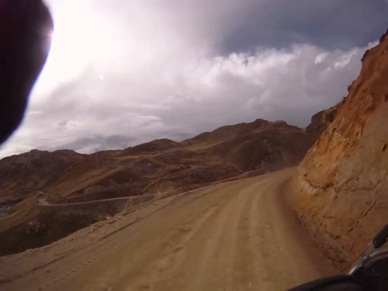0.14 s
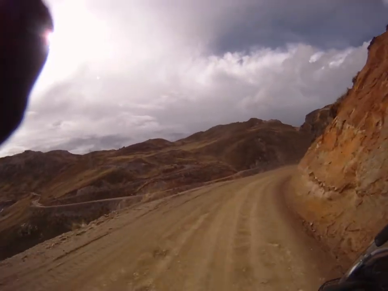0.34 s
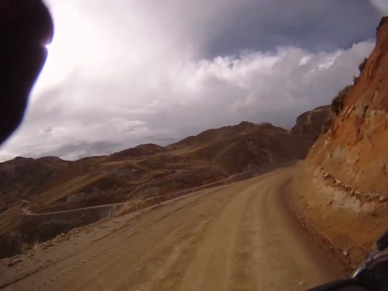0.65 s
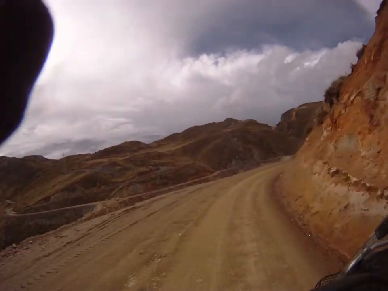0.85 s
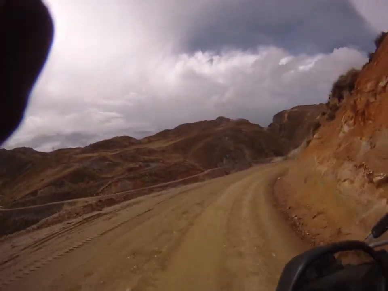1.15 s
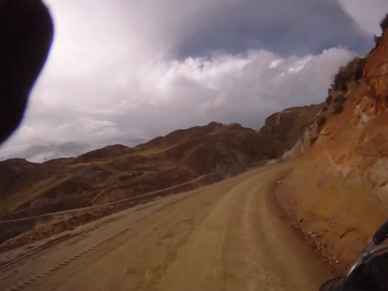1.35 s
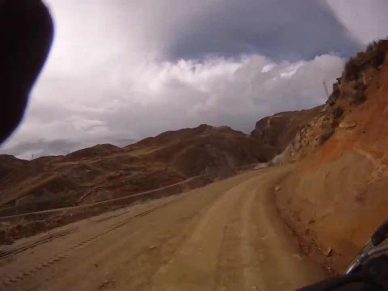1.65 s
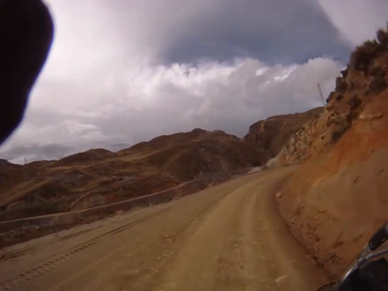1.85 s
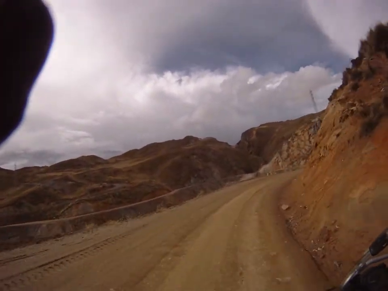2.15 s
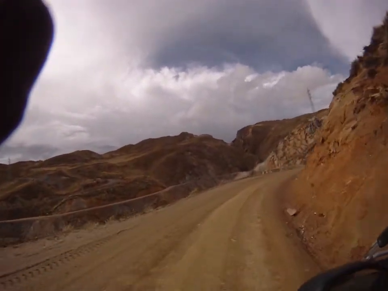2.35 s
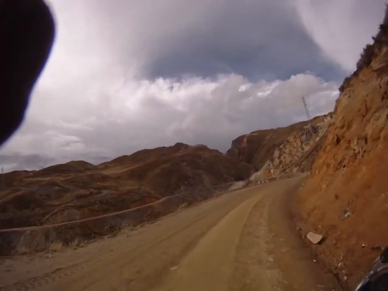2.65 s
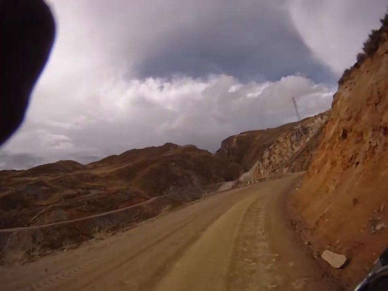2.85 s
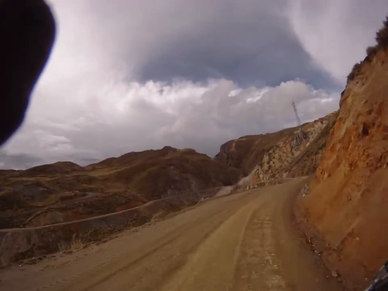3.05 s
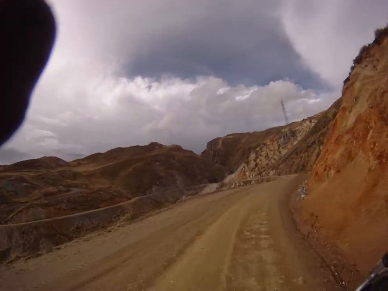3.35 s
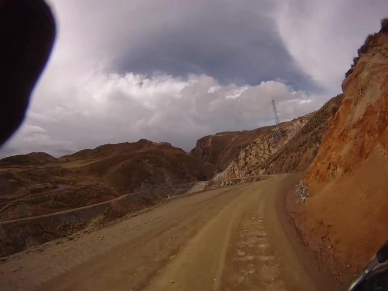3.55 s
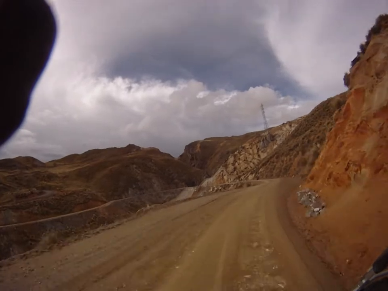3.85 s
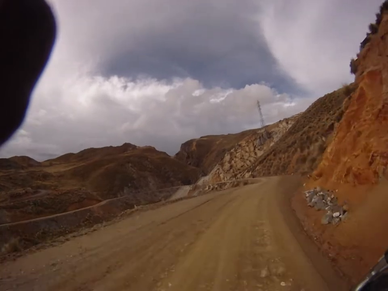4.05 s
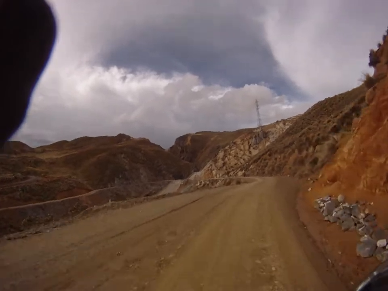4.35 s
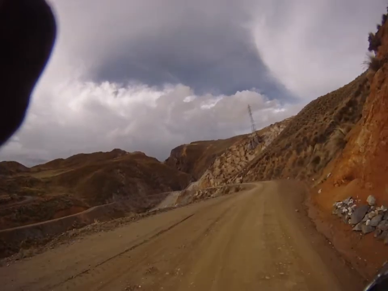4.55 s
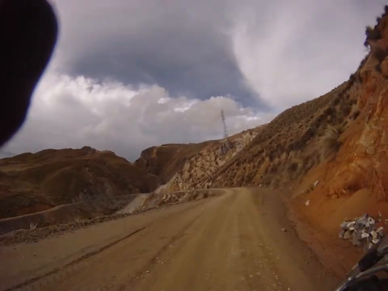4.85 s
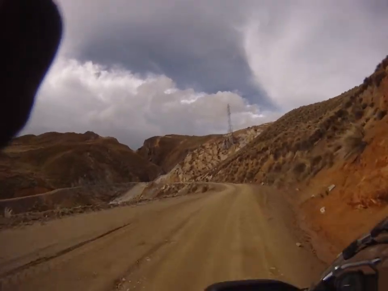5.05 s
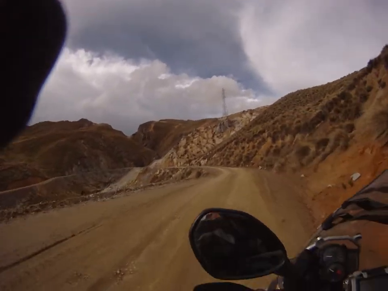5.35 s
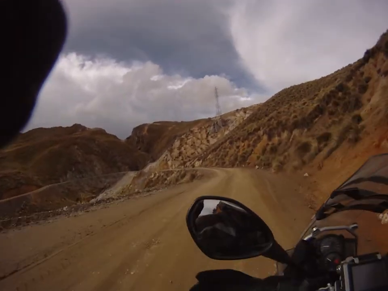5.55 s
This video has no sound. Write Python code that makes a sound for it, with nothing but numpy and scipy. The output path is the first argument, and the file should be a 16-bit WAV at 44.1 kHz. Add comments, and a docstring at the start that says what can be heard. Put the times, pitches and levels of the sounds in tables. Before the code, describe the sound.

Muffled motorcycle engine and gritty tyre roar run along a dirt road, ending in dry rattles, sharp loud knocks and a brief cloth scrape.

```python
"""Motorcycle on a gravel road

A motorcycle rolls along gravel, heard by a small helmet camera in a closed plastic case.
Low engine orders hum as sines under lumps of low wind noise and dull filtered gravel grains.
Noise for engine clatter and tyre roar excites the resonances of the case; straps rattle and knock on it,
cloth drags over it, and pushes move the diaphragm.
The recorder samples at a low rate and holds each sample, which mirrors the spectrum upwards."""
import sys
import numpy as np
from scipy import signal
from scipy.fft import rfft, irfft, next_fast_len
from scipy.io import wavfile

SR = 44100
rng = np.random.default_rng(int(sys.argv[2]) if len(sys.argv) > 2 else 0)


def store_pcm(level_fs):
    """Save levels as 16-bit WAV."""
    pcm = np.round(np.clip(level_fs, -1, 1) * 32767).astype(np.int16)
    wavfile.write(sys.argv[1], SR, np.atleast_2d(pcm).T)


N = 250929  # length in samples

# Wind noise at the port. Each row: frequency in Hz, relative spectral density in dB per Hz.
WIND_SPECTRUM = [(7.1, -32), (12, 9), (86, -0.5), (179, -8), (219, -10), (328, -18.5), (500, -19),
                 (650, -78), (1100, -120)]
# Strength of the wind. Each row: time in seconds, mean level in dB.
WIND_GUSTS = [(0.0, -53), (0.13, -47), (0.45, -46), (0.57, -43.5), (0.8, -51.5), (1.2, -53), (1.7, -47),
              (2.0, -52), (2.5, -48.5), (3.9, -51), (4.12, -48.5), (4.72, -51.5), (5.0, -48), (5.3, -45),
              (5.56, -51), (5.69, -46)]
# Low gravel crunch. Each row: time in seconds, mean level in dB.
CRUNCH_LEVELS = [(0, -54.5), (.6, -53.5), (1.3, -82), (2, -77), (3.4, -60), (4, -51.5), (4.4, -65),
                 (5, -52.5), (5.69, -53)]
# Resonances of the plastic case. Each row: frequency in Hz, bandwidth in Hz, gain in dB.
CASE_MODES = [(528, 231, -6), (1126, 126, -8), (1444, 63, -2), (1664, 500, 5), (2353, 521, 1.5),
              (2940, 272, -5.5), (3174, 185, -5.5), (3710, 281, 3), (4440, 500, -12), (4680, 490, -24.5),
              (6060, 51, -55)]
# Strap rattling on the case. Each row: nominal time in seconds, nominal peak in dB, decay length in ms,
# pitch of the contact in Hz.
STRAP_RATTLES = [(0.1587, -47, 13, 1770), (0.3674, -35, 18, 2310), (2.186, -30, 7, 1630),
                 (3.8843, -36, 7.5, 1800), (3.917, -26.5, 8.9, 1720), (3.9489, -29, 12, 2320),
                 (3.986, -23.5, 18, 1750), (4.0052, -27, 9.4, 2120), (4.039, -50, 14, 1580),
                 (4.057, -27.5, 7.6, 1600), (4.082, -24, 10, 2080), (4.11, -28, 12, 1930),
                 (4.132, -27, 4.4, 3600), (4.1436, -20.5, 9.8, 1970), (4.1986, -20.5, 22, 2240),
                 (4.433, -28, 18, 3300), (4.6647, -20, 24, 2030), (4.7296, -21.5, 24, 2700),
                 (4.7644, -35, 22, 760), (4.795, -20, 10.5, 1840), (4.849, -32, 20, 3540),
                 (4.8677, -25.5, 14, 1770), (4.9242, -39, 4, 2090)]
# Hard knocks on the case. Each row: start in seconds, rms level over the blow in dB, length in ms,
# pitch of the contact in Hz, relative gain of the dull body in dB, signed push on the diaphragm.
CASE_KNOCKS = [(1.594, -24.5, 0.87, 860, 14.5, 0.03), (4.9994, -10, 4.6, 1760, -2, -0.36),
               (5.028, -17.5, 8.8, 1850, -22, -0.031), (5.0321, -10.5, 3.35, 3520, 17, 0.15),
               (5.2083, -12.5, 1.9, 1100, 9, 0.11), (5.2989, -17.5, 1.05, 1130, -11, 0.018),
               (5.3165, -16, 0.74, 2240, -8, -0.072), (5.321, -32, 1.7, 2020, -6, -0.014)]
# Soft shoves that only move the diaphragm. Each row: start in seconds, length in ms, signed push.
SOFT_SHOVES = [(5.279, 15, 0.024), (5.304, 8.4, -0.038), (5.332, 4.7, 0.062), (5.339, 10, -0.023),
               (5.617, 9.8, -0.016), (5.627, 7.5, 0.025)]
# Engine and tyre roar outside the case. Each row: frequency in Hz, relative spectral density in dB per Hz.
ROAR_SPECTRUM = [(150, -35), (260, 10), (450, -4.5), (800, -9.5), (1300, -1), (2400, -5.5), (3100, 3),
                 (4300, -4.5), (5300, 3.5), (5700, -4), (6100, -7)]
# Engine speed. Each row: time in seconds, crank turns per second.
CRANK_SPEED = [(0.0, 40.6), (0.22, 43.0), (0.6, 41.2), (0.73, 44.6), (1.2, 41.9), (1.31, 44.6),
               (1.55, 43.1), (1.7, 44.3), (1.9, 43.6), (2.1, 44.5), (2.45, 43.6), (2.75, 44.4), (3.0, 43.8),
               (3.75, 43.3), (3.88, 44.4), (4.2, 42.7), (4.55, 41.3), (4.75, 42.0), (5.0, 40.8),
               (5.69, 40.6)]
# Engine orders at cruising speed. Each row: multiple of the crank rate, mean rms level in dB before wavering.
ENGINE_ORDERS = [(.5, -61), (1, -58.5), (2, -57), (3, -60.5), (5, -66), (9, -74), (11, -76), (13, -70),
                 (15, -72), (16, -75), (18, -76)]

LUMP_DB, WAVER_DB = 1.7, 1.5  # spread of the lumps in wind and crunch, and of the wavering hum
RUB_S, RUB_DB, RUB_GRAIN_DB = 5.296, -35.5, 3.5  # start, level, unevenness of the drag
RUB_ATTACK_S, RUB_HOLD_S, RUB_FADE_DB_PER_S = 0.0058, 0.061, 330  # the hold is counted from the start
RATTLE_GRIT, RATTLE_ATTACK_MS = 0.7, 2.3  # log spread of micro-contact sizes, rise time
RATTLE_CREST_DB = 14  # nominal peak over rms
RATTLE_THUD_DB = -59  # offsets the rattle level, so strong rattles have relatively less dull body
SLIP_SPREAD_DB, BLOW_FADE_DB = 3, 2.5  # unevenness of the slips, loss of strength along a blow
PUSH_MS = 1.88  # push under a blow of 1 ms; it grows with the root of the blow's length
CRUISE_PER_S = 43.4  # crank turns per second
ROAR_DB, ROAR_DB_PER_TURN = -43.5, 0.66  # level at cruise, rise with each further turn per second
PATCH_S, PATCH_HALF_S, PATCH_DB = 4.13, 0.2, 2.5  # loose patch of road: middle, half length, rise of the roar
HUM_DB_PER_TURN = 0.13  # per order and further turn per second: high orders sing when the engine pulls
OVERLOAD = 1.1  # height towards which peaks are rounded
GUARD_HZ, CUTOFF_HZ = 5830, 15270  # low-pass ahead of the sampler, final low-pass
HOLD_UP, HOLD_DOWN, HOLD = 40, 147, 4  # ratio from 44.1 to 12 kHz, copies of each sample


def from_db(db):
    """Level law: twenty decibels are a factor of ten in amplitude."""
    return 10 ** (np.asarray(db) / 20)


def rms_one(x):
    """Power normalisation: scale a signal to rms 1."""
    return x / np.sqrt(np.mean(x ** 2) + 1e-20)


def in_time(rows):
    """Linear interpolation: a curve of time and value, sample by sample."""
    seconds, values = np.transpose(rows)
    return np.interp(np.arange(N) / SR, seconds, values)


def drift(rate):
    """Low-passed noise: two equal poles at the rate in Hz leave slow chance of spread 1."""
    step = 20  # samples between computed points
    pole = np.exp(-2 * np.pi * rate * step / SR)
    noise = rng.standard_normal(N // step + 2002)
    slow = signal.lfilter([1], [1, -2 * pole, pole * pole], noise)[2000:]  # settled part
    return np.interp(np.arange(N) / step, np.arange(len(slow)), rms_one(slow))


def coloured(x, spectrum):
    """Spectral shaping: weight each frequency of a noise; the result has rms 1."""
    size = next_fast_len(N)
    table_hz, table_db = np.transpose(spectrum)
    hz = np.maximum(np.arange(size // 2 + 1) * SR / size, 1)
    gain = from_db(np.interp(np.log(hz), np.log(table_hz), table_db))
    return rms_one(irfft(rfft(x, size) * gain, size)[:N])


def resonance(x, hz, width):
    """Damped oscillator: a pole pair whose radius sets the bandwidth, with gain 1 on top."""
    radius = np.exp(-np.pi * width / SR)
    zeros = np.array([1, 0, -1]) * (1 - radius * radius) / 2
    poles = [1, -2 * radius * np.cos(2 * np.pi * hz / SR), radius * radius]
    return signal.lfilter(zeros, poles, x)


def case(x):
    """Modal superposition: all resonances of the plastic case ring at once, with alternating sign."""
    return sum((-1) ** k * from_db(db) * resonance(x, hz, width)
               for k, (hz, width, db) in enumerate(CASE_MODES))


def add(out, s, sound):
    """Superposition in time: mix a short sound in at s seconds."""
    at = round(s * SR)
    out[at:at + len(sound)] += sound[:N - at]


def wind(wind_db):
    """Turbulent pressure at the microphone port: lumpy noise, strongest at low frequencies."""
    lumps = rng.standard_normal(N) * from_db(LUMP_DB * drift(17.6))
    return coloured(lumps, WIND_SPECTRUM) * from_db(wind_db)


def crunch(level_db):
    """Granular friction: uneven gravel grains under the tyres, dulled by two broad resonances."""
    grains = rng.standard_normal(N) * from_db(LUMP_DB * drift(44.0))
    dull = resonance(resonance(grains, 1270, 1300), 1030, 1460)
    return rms_one(dull) * from_db(level_db)


def rub():
    """Stick-slip friction: scratchy grains of dragging cloth excite the case, leaning to its low modes."""
    grains = rng.standard_normal(N) * from_db(RUB_GRAIN_DB * drift(320.0))
    scratch = rms_one(case(grains) + from_db(24) * resonance(grains, 1210, 670))
    since = np.arange(N) / SR - RUB_S
    attack = np.clip(since / RUB_ATTACK_S, 0, 1)
    fade_db = RUB_FADE_DB_PER_S * np.maximum(since - RUB_HOLD_S, 0)
    return scratch * attack * from_db(RUB_DB - fade_db)


def contact(level_db, ms, hz, body_db, clicks, tone_db, leak_db):
    """Impact excitation: micro-contacts ring the case, the contact pitch and a dull body; some leak in."""
    thin = signal.sosfilt(signal.butter(2, 900, "high", fs=SR, output="sos"), clicks)
    tone = from_db(tone_db) * resonance(thin, hz, hz / 4.0)
    body = from_db(body_db) * resonance(clicks, 680, 720)
    rung = case(thin) + tone + body + from_db(leak_db) * clicks
    # the whole energy equals that of the given rms over the nominal length
    return from_db(level_db) * rung / np.sqrt(np.sum(rung ** 2) / (ms * SR / 1000))


def rattles():
    """Repeated micro-impacts: gritty strap bursts with a sudden start and a longer exponential fall."""
    out = np.zeros(N)
    for s, db, ms, hz in STRAP_RATTLES:
        noise, sizes = rng.standard_normal((2, 2000))
        since_ms = np.arange(2000) * 1000 / SR
        envelope = np.minimum(since_ms / RATTLE_ATTACK_MS, 1) * np.exp(-2.2 * since_ms / ms)
        clicks = noise * np.exp(RATTLE_GRIT * sizes) * envelope
        burst = contact(db - RATTLE_CREST_DB, ms, hz, RATTLE_THUD_DB - db, clicks, tone_db=9.0, leak_db=-56)
        add(out, s - .0015, burst)  # the rise begins just ahead of the nominal time
    return out


def push(ms, firmness):
    """Quasi-static displacement: the diaphragm is pressed and let go; firmness steepens the flanks."""
    arch = np.sin(np.linspace(0, np.pi, round(ms * SR / 1000)))
    return np.tanh(firmness * arch) / np.tanh(firmness)


def knocks():
    """Chattering impact: slips about 1 ms apart push one way, weaken and stop dead while the case rings."""
    out = np.zeros(N)
    for s, db, ms, hz, body_db, pushed in CASE_KNOCKS:
        clicks = 0.075 * rng.standard_normal(1500)
        timing, strength = rng.standard_normal((2, 12))
        gaps_ms = np.clip(0.995 + 0.12 * timing, .3, 3.0)
        at = np.cumsum(gaps_ms * SR / 1000).astype(int)
        clicks[at - at[0]] += np.sign(pushed) * from_db(SLIP_SPREAD_DB * strength)
        along = np.arange(1500) * 1000 / SR / ms  # 1 at the end of the blow
        clicks *= (along < 1) * from_db(-BLOW_FADE_DB * np.minimum(along, 1))
        add(out, s, contact(db, ms, hz, body_db, clicks, tone_db=15.5, leak_db=-1.5))
        add(out, s, pushed * push(PUSH_MS * np.sqrt(ms), firmness=3.3))
    return out


def shoves():
    """Slow displacement: soft pushes move the diaphragm without ringing the case."""
    out = np.zeros(N)
    for s, ms, pushed in SOFT_SHOVES:
        add(out, s, pushed * push(ms, firmness=0.91))
    return out


def roar(turns, roar_db):
    """Amplitude modulation: grit throbs with the crank and five times per turn with the valve gear, in the case."""
    crank_db = 1.0 * np.cos(2 * np.pi * turns) + 0.28 * np.cos(4 * np.pi * turns + 0.62)
    valve_db = 0.62 * np.cos(10 * np.pi * turns)
    flicker_db = 0.45 * drift(1.6) + 0.75 * drift(31.0) + 0.22 * drift(115.0)
    noise = rng.standard_normal(N) * from_db(crank_db + valve_db + flicker_db)
    return rms_one(case(coloured(noise, ROAR_SPECTRUM))) * from_db(roar_db)


def hum(turns, per_s):
    """Harmonic synthesis: engine orders are sines locked to the crank, each wavering a little in level."""
    out = np.zeros(N)
    for order, db in ENGINE_ORDERS:
        pull_db = HUM_DB_PER_TURN * order * (per_s - CRUISE_PER_S)
        level = from_db(db + pull_db + WAVER_DB * drift(3.0))
        out += np.sqrt(2) * level * np.sin(2 * np.pi * (order * turns + rng.random()))
    return out


def scene():
    """Linear superposition: everything that reaches the diaphragm."""
    per_s = in_time(CRANK_SPEED)
    turns = np.cumsum(per_s) / SR
    patch = np.exp(-((np.arange(N) / SR - PATCH_S) / PATCH_HALF_S) ** 4)
    roar_db = ROAR_DB + ROAR_DB_PER_TURN * (per_s - CRUISE_PER_S) + PATCH_DB * patch
    surroundings = wind(in_time(WIND_GUSTS)) + crunch(in_time(CRUNCH_LEVELS))
    handling = rub() + rattles() + knocks() + shoves()
    engine_and_tyres = roar(turns, roar_db) + hum(turns, per_s)
    return (surroundings + handling + engine_and_tyres)[None]


def record(dry):
    """Sampling and zero-order hold: rounded peaks, 12 kHz samples, mirror bands, then the top is cut."""
    coupled = signal.sosfilt(signal.butter(2, 22, "high", fs=SR, output="sos"), dry)  # a push swings back
    rounded = OVERLOAD * np.tanh(coupled / OVERLOAD)
    guarded = signal.sosfilt(signal.butter(3, GUARD_HZ, fs=SR, output="sos"), rounded)
    low_rate = signal.resample_poly(guarded, HOLD_UP, HOLD_DOWN, axis=1)
    held = np.repeat(low_rate, HOLD, axis=1)
    back = signal.resample_poly(held, HOLD_DOWN, HOLD_UP * HOLD, axis=1)[:, :N]
    return signal.sosfilt(signal.ellip(12, .5, 60, CUTOFF_HZ, fs=SR, output="sos"), back)


dry = scene()
out = record(dry)
store_pcm(out)
```